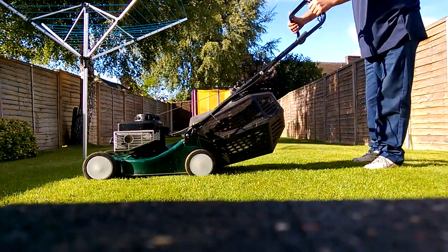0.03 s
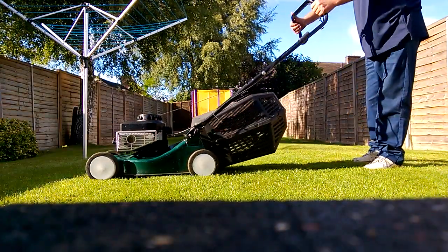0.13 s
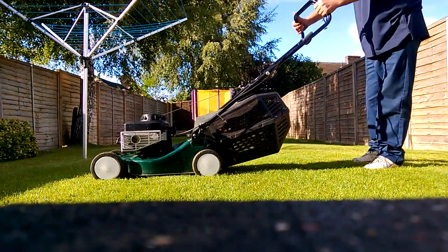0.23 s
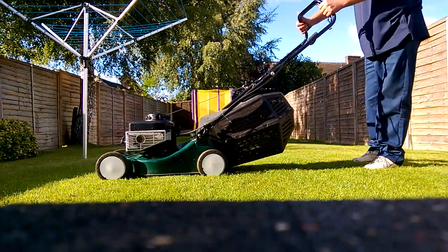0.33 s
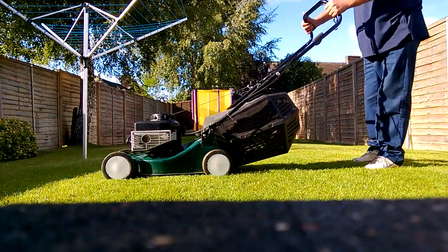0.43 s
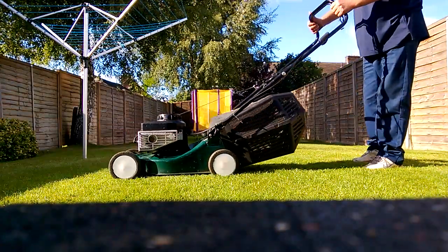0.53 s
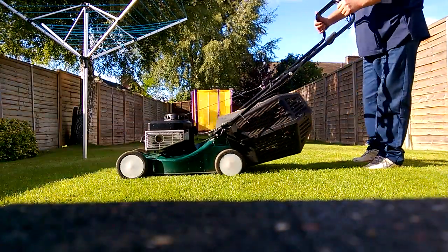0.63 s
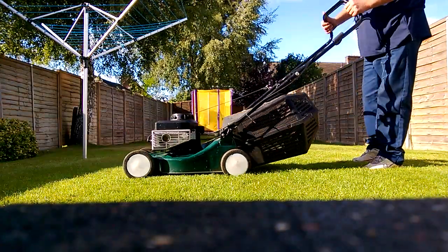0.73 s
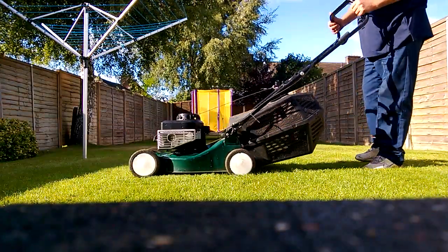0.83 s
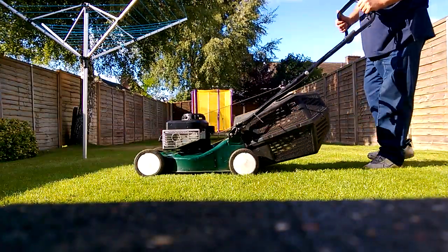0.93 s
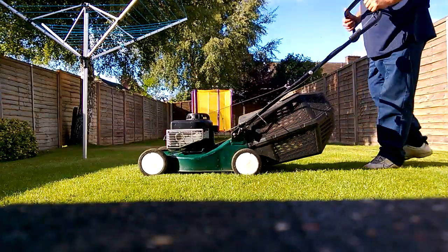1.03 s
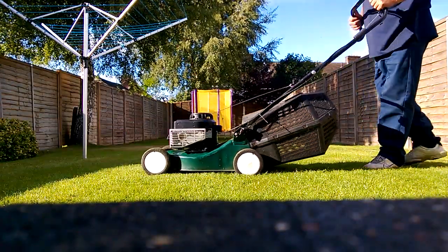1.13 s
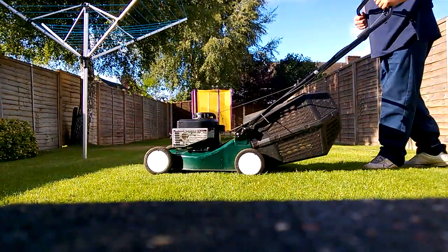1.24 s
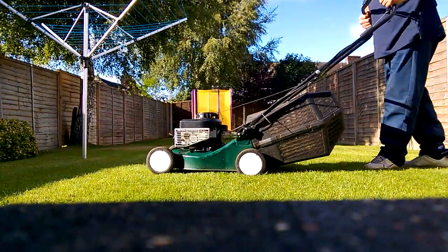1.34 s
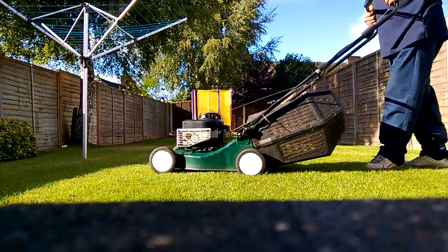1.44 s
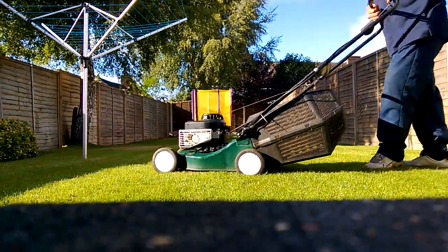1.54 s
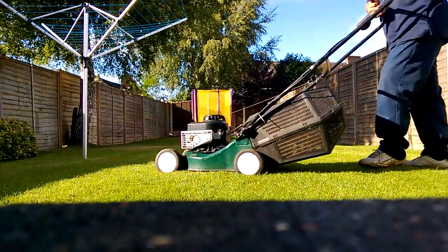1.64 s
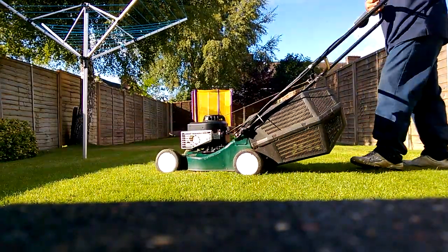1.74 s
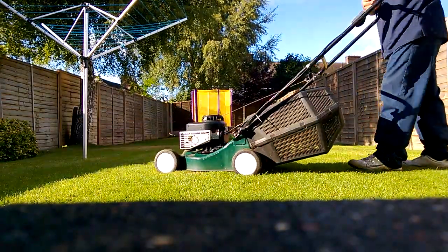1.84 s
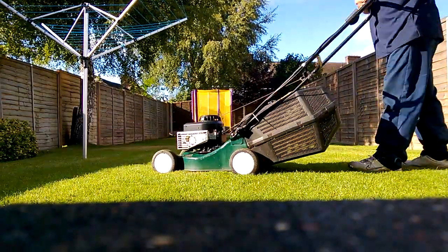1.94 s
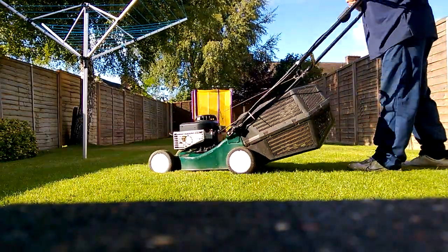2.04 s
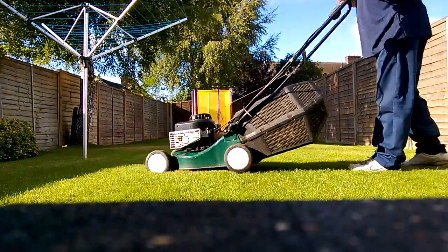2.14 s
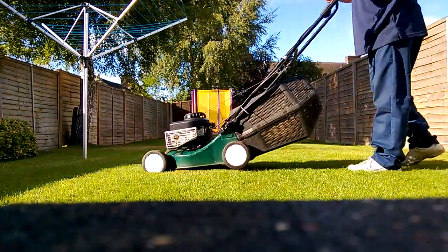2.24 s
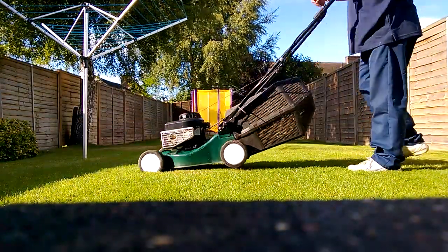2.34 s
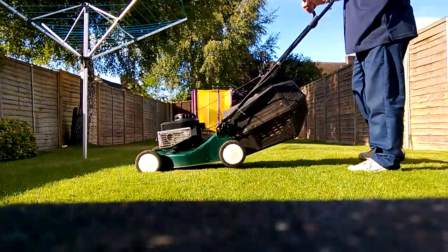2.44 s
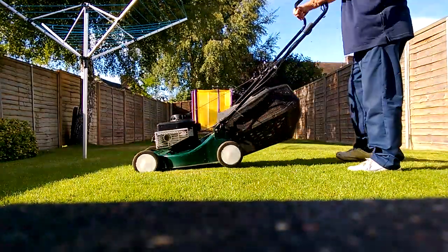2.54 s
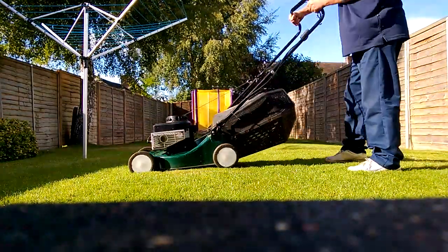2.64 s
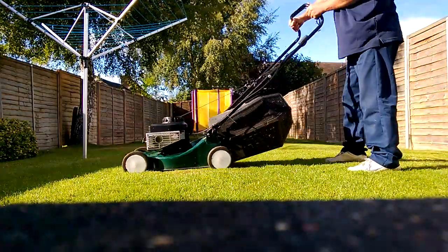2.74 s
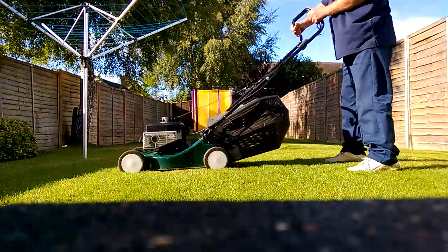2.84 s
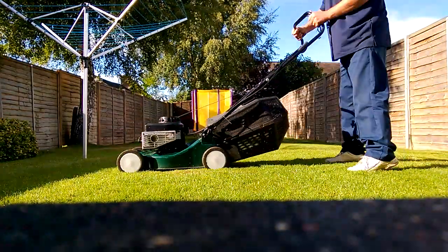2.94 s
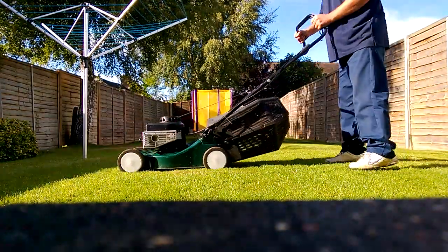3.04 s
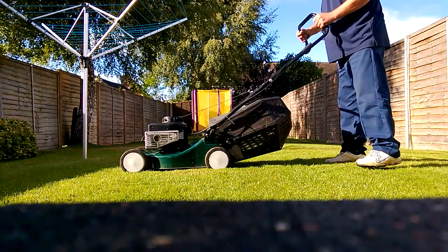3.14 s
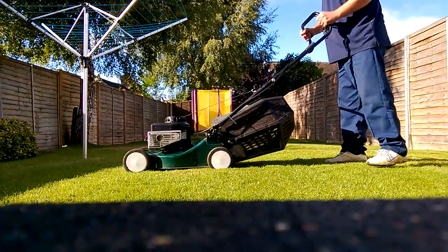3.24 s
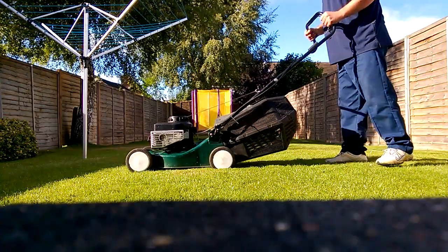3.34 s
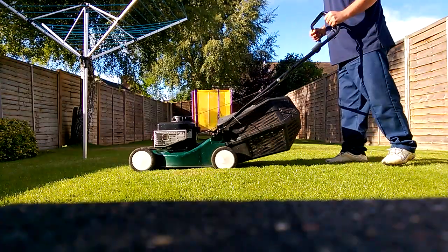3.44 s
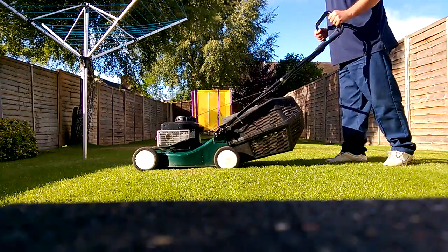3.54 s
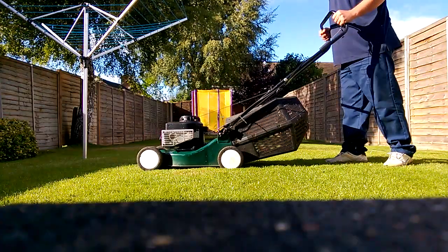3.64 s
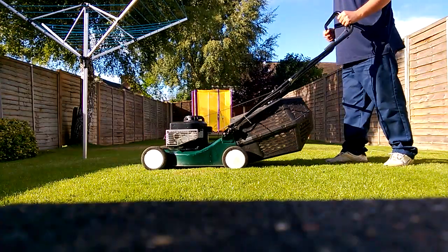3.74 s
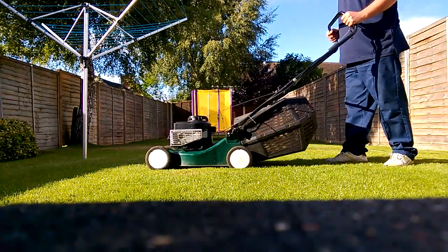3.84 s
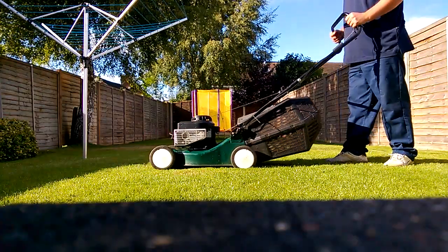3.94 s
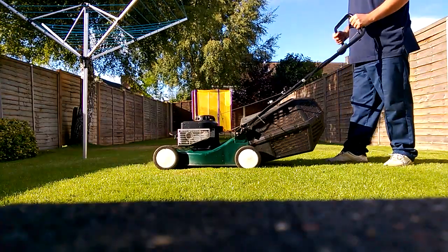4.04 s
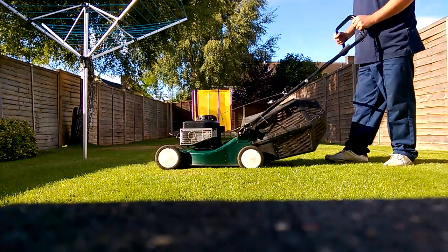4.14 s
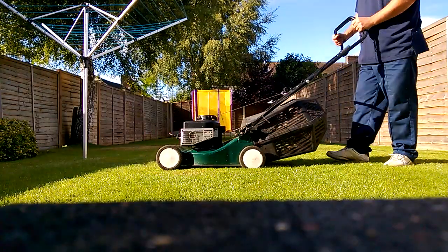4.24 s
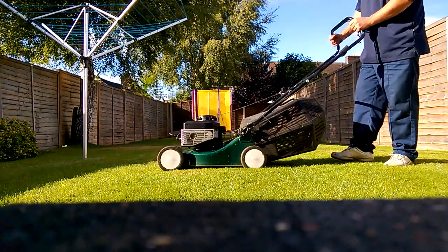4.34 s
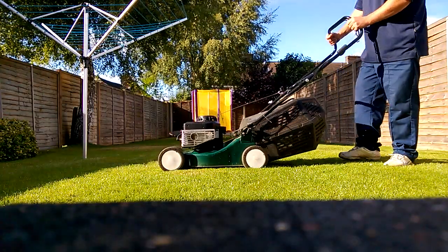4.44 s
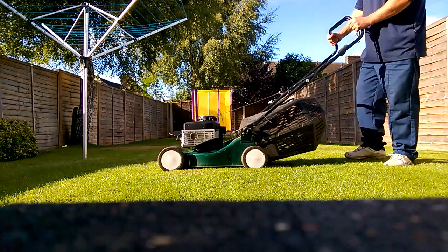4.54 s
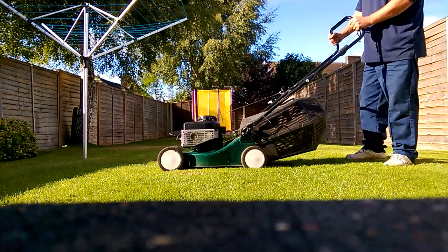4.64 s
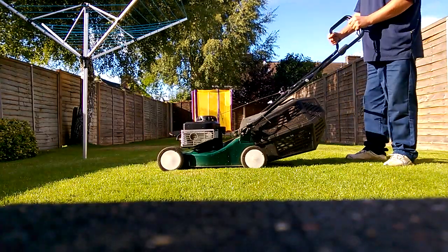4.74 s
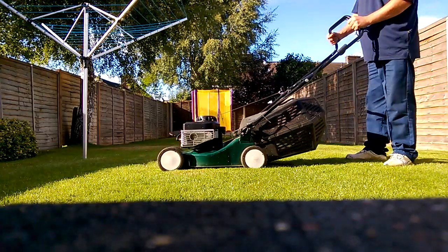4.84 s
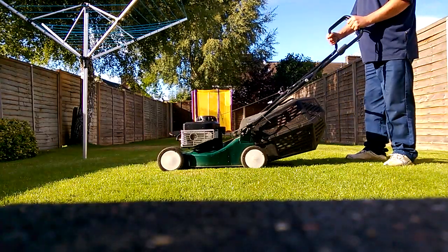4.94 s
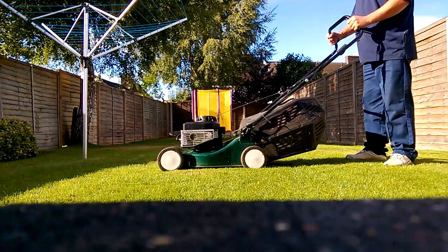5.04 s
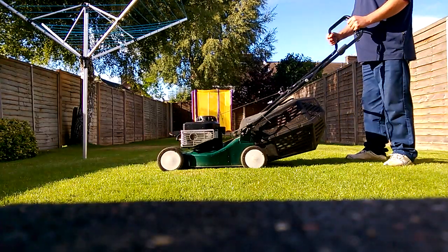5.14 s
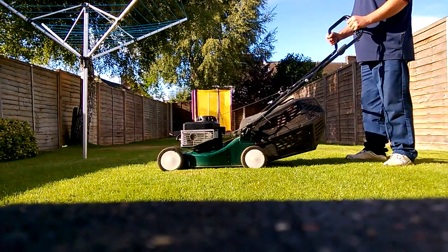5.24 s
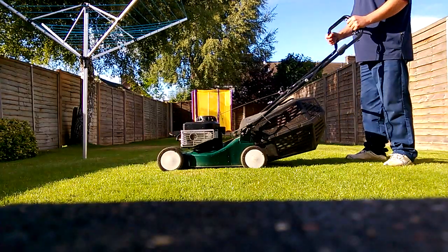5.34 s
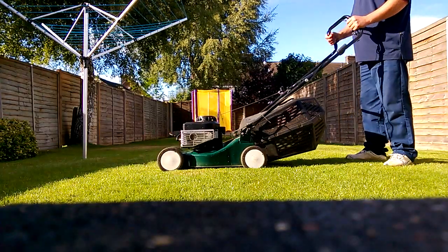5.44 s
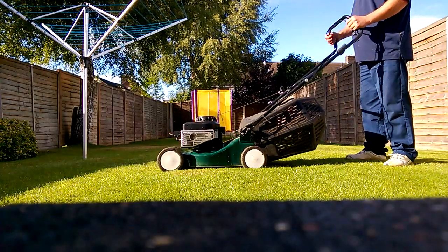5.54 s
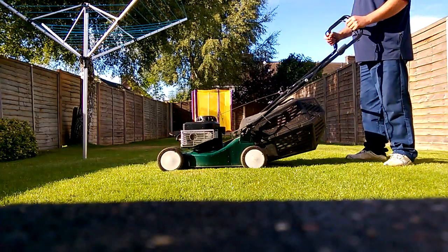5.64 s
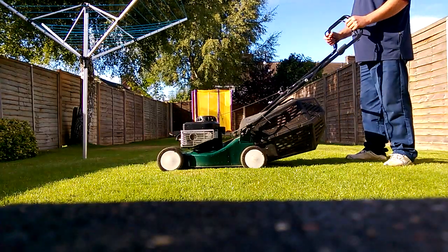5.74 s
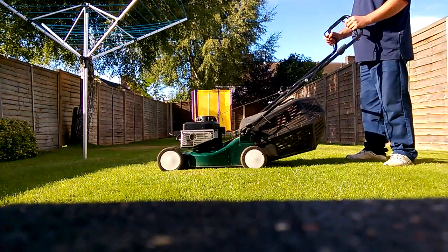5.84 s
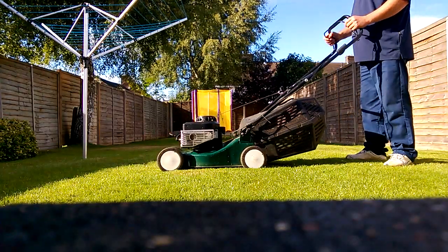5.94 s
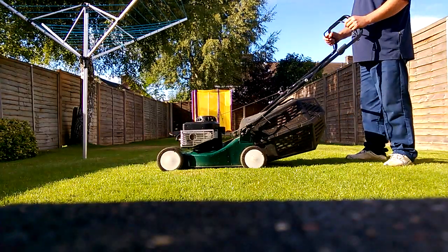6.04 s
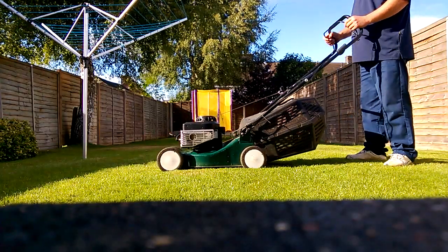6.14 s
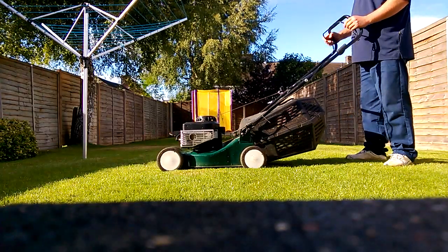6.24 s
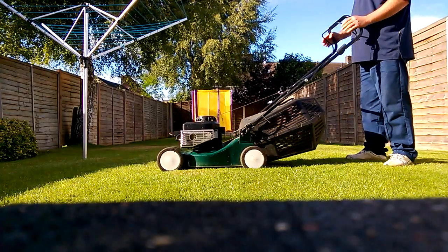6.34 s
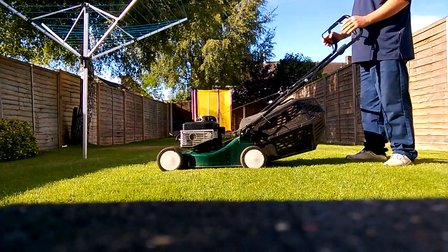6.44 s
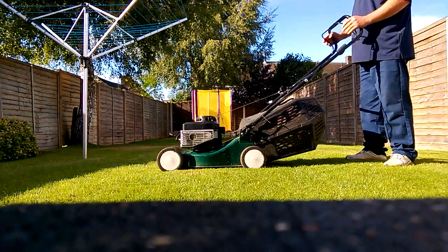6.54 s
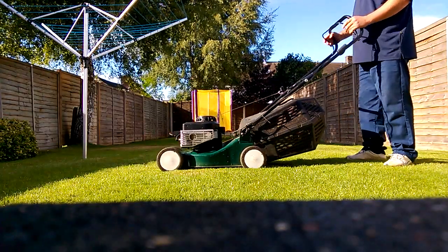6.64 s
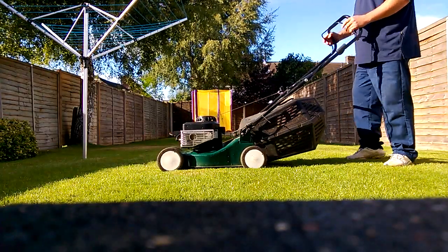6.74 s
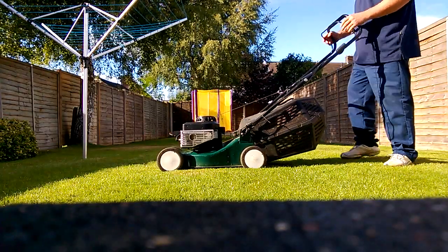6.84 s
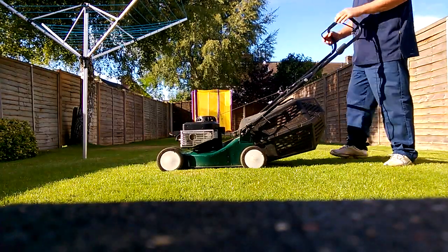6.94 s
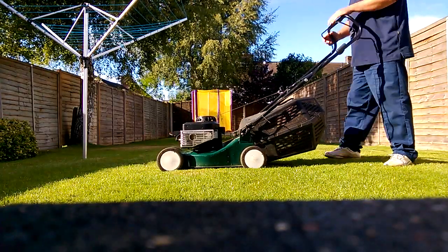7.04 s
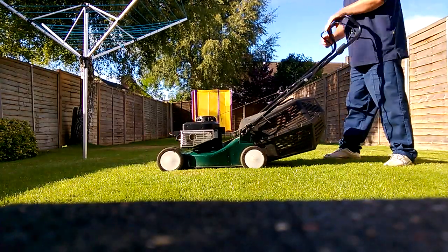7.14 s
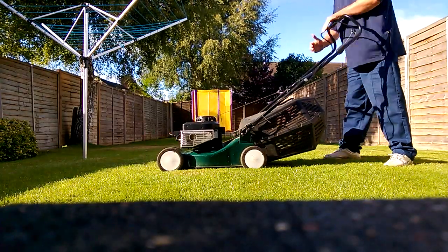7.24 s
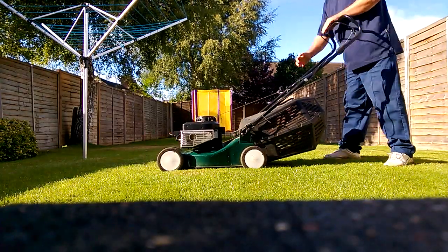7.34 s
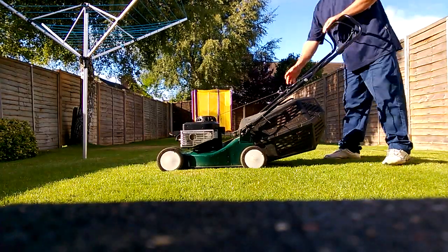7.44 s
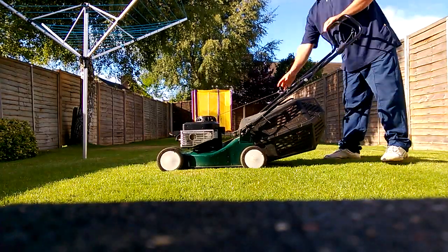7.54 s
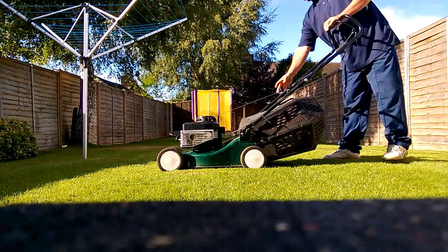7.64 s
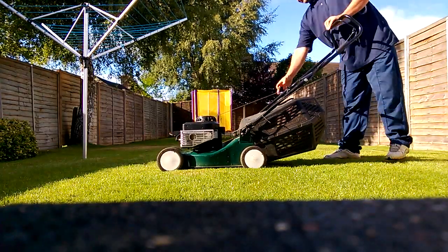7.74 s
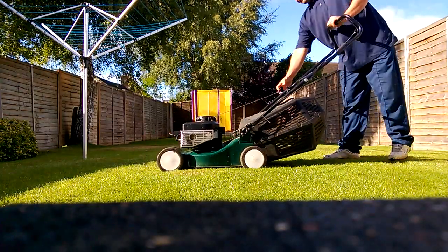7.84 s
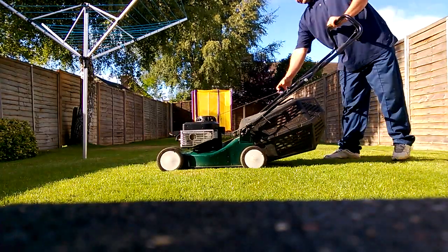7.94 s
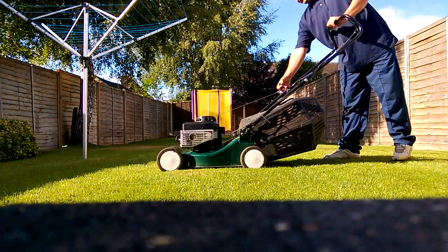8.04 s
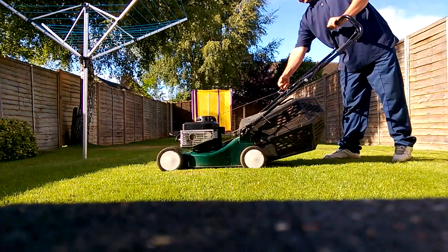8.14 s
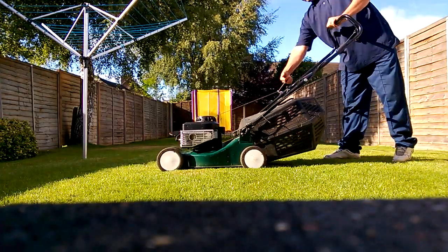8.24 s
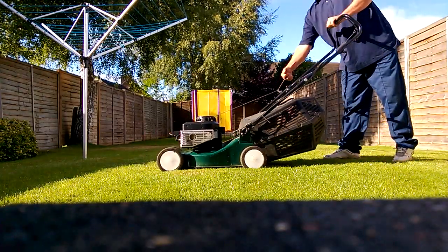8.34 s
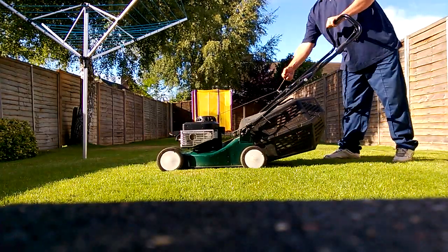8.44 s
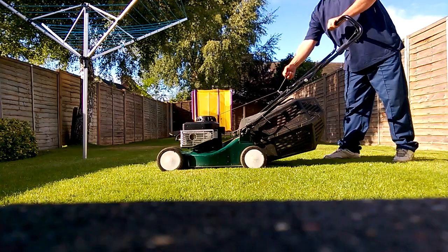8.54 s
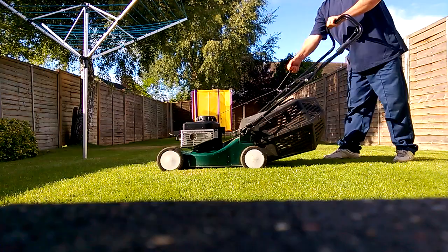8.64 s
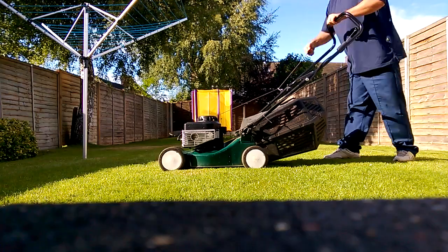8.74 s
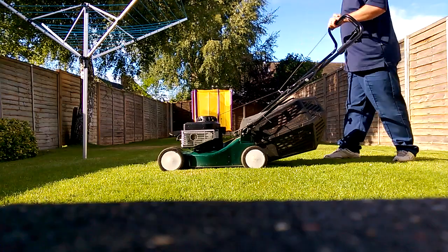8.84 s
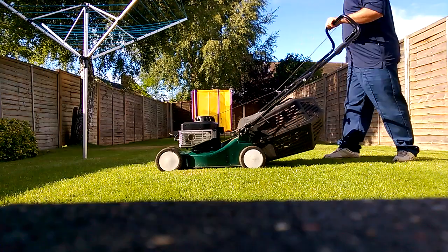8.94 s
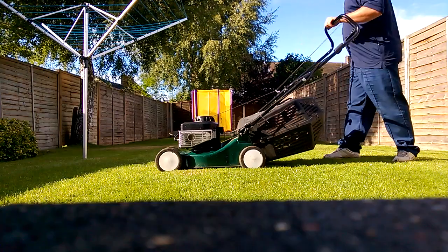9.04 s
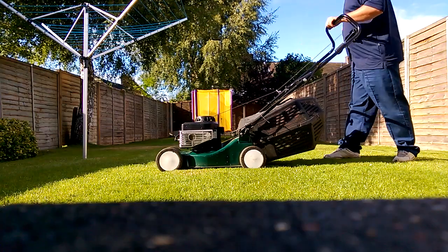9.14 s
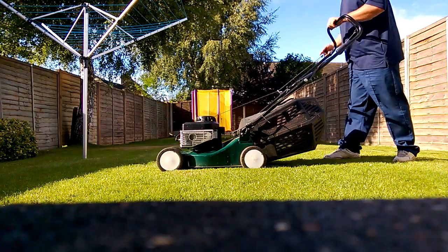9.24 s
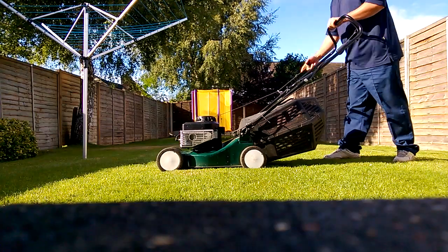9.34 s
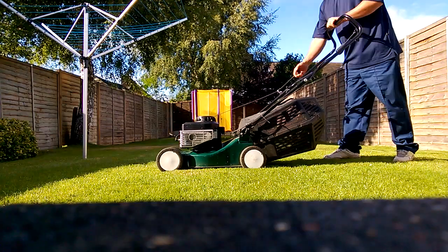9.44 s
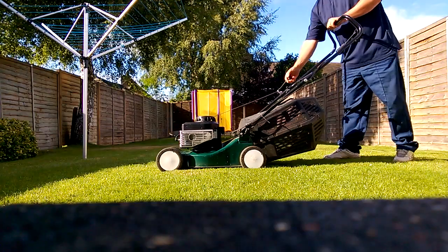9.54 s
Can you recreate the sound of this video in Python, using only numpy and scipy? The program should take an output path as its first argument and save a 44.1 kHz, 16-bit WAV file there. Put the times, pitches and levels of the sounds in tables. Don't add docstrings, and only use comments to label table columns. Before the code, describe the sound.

Outdoors in a small garden, a mower's rapid chugging and rushing blade noise hold steady for about six seconds, then sink quickly in pitch and die with hollow knocks. Faint wind and leaf rustle remain. Two dry handle clicks with a cable scrape follow, then a short starter whine, ratchety rattle and strong irregular pops as the engine roars back. Close microphone, short fence echoes.

```python
import sys
import numpy as np
from scipy import signal
from scipy.io import wavfile

SR = 44100
rng = np.random.default_rng(int(sys.argv[2]) if len(sys.argv) > 2 else 0)


def file_out(sig):
    cols = np.atleast_2d(sig).T
    lim = np.clip(cols, -1, 1)
    pcm = np.round(lim * 32767).astype(np.int16)
    wavfile.write(sys.argv[1], SR, pcm)


def ratio(d):
    e = np.asarray(d, float) / 20
    return 10 ** e


N = 422919
GOVERNED_PER_S = 23.4
PULL_START_S = 8.66


def crank():
    # (time [s], speed [firings/s])
    running = [(0.0, 22.961), (0.36, 23.568), (1.15, 23.381), (1.87, 22.937), (2.12, 24.069), (2.36, 23.03),
               (2.7, 22.622), (2.85, 23.746), (3.74, 23.224), (3.97, 24.156), (4.22, 22.596), (4.5, 23.807),
               (4.63, 23.746), (4.83, 22.496), (5.21, 23.837), (5.89, 23.587), (6.17, 19.766),
               (6.62, 4.647)]
    # (time [s], speed [firings/s])
    restarting = [
        (8.66, 0),
        (8.7, 4.566),
        (8.91, 11.274),
        (9.07, 21.34),
        (9.21, 24.96),
        (9.45, 22.643),
        (9.6, 22.297),
    ]
    first, second = in_time(running, 0)[0], in_time(restarting, 0)[0]
    first_turns = np.cumsum(first) / SR - .645
    second_turns = np.cumsum(second) / SR - .975 + 200
    again = np.arange(N) >= PULL_START_S * SR
    return np.where(again, second_turns, first_turns) + 1, first + second


def charges(turns):
    # (time [s], puff above its layer [dB], thump above its layer [dB])
    pops = [(6.53, 0.5, 2), (8.832, 3, 16.5), (8.928, -2.5, 10), (8.998, 4, 7.5), (9.05, 2, 7.5),
            (9.098, 0.5, 5.5), (9.143, 1.5, 5), (9.183, 3, 5.5), (9.225, -6, 0), (9.266, 2, 5.5),
            (9.307, -1.5, -2), (9.348, 2.5, 4), (9.391, -18, 0), (9.435, 2, 0), (9.479, -1.5, 2),
            (9.523, 0.5, -2), (9.568, -2, -1)]
    strength = rng.standard_normal((240, 2)) * [1.5, 1.0]
    for s, puff_db, thump_db in pops:
        strength[int(np.round(turns[int(s * SR)]))] = puff_db, thump_db
    return strength


def thump(turns, coast, strength, level_db):
    # (frequency [Hz], level [dB], t60 [s])
    muffler = [(161, 2, .03), (143, 1, .15), (215, -5, .05), (56, -9.5, .08)]
    # (frequency [Hz], level [dB], t60 [s])
    intake = [(90, 9.5, 0.038), (470, -4, 0.054)]
    # (delay [s], level [dB])
    fences = [(.0144, -7.5), (.0248, -4), (.0294, -8)]
    cycle = np.floor(turns + .0835).astype(int)
    firing = np.diff(cycle, prepend=cycle[0]) == 1
    clicks = firing * ratio(strength[cycle, 1] + level_db)
    push = signal.lfilter([.08], [1, -.92], clicks)
    governor = 2.0 * np.minimum(4 * coast, 1) * (1 - 0.38 * coast)
    intake_open = np.maximum(governor, np.arange(N) > PULL_START_S * SR)
    boom = -np.roll(ring(push * intake_open, intake), round(.006 * SR))
    return echoed(ring(push, muffler), fences) + boom


def shaft_tones(turns, speed, coast, level_db, blade_db, fan_db, fins_db):
    # (multiple of firing rate [1], level [dB], lag [turns])
    shaft = [(2, -6, .36), (4, -13, .65), (10, -9, .47), (12, -7.5, .58), (14, -19, .3)]
    coasting = [6, 8.3, 1.5, 10.8, 4]
    # (multiple of firing rate [1], level [dB])
    fins = [(18, -16), (20, -16.5), (21, -18.5), (25, -25), (27, -27.5), (28, -18.5), (32, -20.5),
            (36, -22.5)]
    tones = 0
    for (order, db, lag), coast_db in zip(shaft, coasting):
        part_db = blade_db if order < 5 else fan_db
        gain = ratio(db + coast * coast_db + part_db + .2 * order * drift(4))
        wobbly_turns = turns + .004 * drift(5)
        tones = tones + gain * np.sin(2 * np.pi * (order * wobbly_turns - lag))
    for order, db in fins:
        gain = ratio(db + fins_db + 2.0 * drift(0.97))
        tones = tones + gain * np.sin(2 * np.pi * (order * turns + 0.16 * drift(4.1)))
    return tones * ratio(level_db) * np.minimum(speed / 17, 1) ** 3.0


def exhaust_hiss(turns, speed, facing_db, coast, strength, level_db):
    # (frequency [Hz], density [dB per Hz])
    hiss = [(1180, -44), (2000, -2.5), (2860, -1), (3400, -1), (5390, -9), (7640, -5.5), (10300, -5.5),
            (12700, -11.5), (15200, -10), (16000, -17)]
    angle = (turns + 0.044) % 1
    cycle = np.floor(turns + 0.073).astype(int)
    jet = (angle / 0.035) ** 2 * np.exp(2 - 2 * angle / 0.032)
    wheeze = np.exp(-(angle / 0.33) ** 0.98) * (1 - np.exp(-angle / 0.025))
    stroke = ratio(8.0 - 5.4 * coast) * jet + ratio(6.0 + 1.33 * coast) * wheeze
    gas = coloured(hiss, patchy_db=0.0)
    puffs = gas * ratio(strength[cycle, 0]) * stroke
    puffs = duller(puffs, 6700, share=rng.uniform(-0.23, 0.23, 240)[cycle])
    echo = ratio(-8) * duller(np.roll(puffs, round(0.014 * SR)), 11000, share=0.16)
    leak_db = -4.0 - 1.2 * coast - 0.64 * facing_db
    leak = ratio(leak_db) * np.roll(gas, SR) * (speed / GOVERNED_PER_S) ** 0.76
    return ratio(level_db) * duller(puffs + echo + leak, 8100, share=coast ** 2)


def blade_roar(turns, coast, level_db):
    # (frequency [Hz], density [dB per Hz])
    roar = [(35, -13.5), (60, -11.5), (140, -6.5), (170, -45.5), (235, 13.5), (320, -16.5), (470, -0.5),
            (700, -10), (1020, -8.5), (1470, -12), (2060, -19), (3580, -30), (5000, -28.5), (6500, -45.5)]
    # (frequency [Hz], level [dB], t60 [s])
    deck = [(403, -10, 0.18), (486, -6.5, 0.31), (640, -9.5, 0.22), (690, -33, .06), (846, 2, 0.11),
            (1239, -2.5, 0.053), (1424, -4, 0.31)]
    tips = 0.067 * np.cos(8 * np.pi * (turns - .02))
    firings = .5 * np.exp(-((turns + 0.18) % 1) / 0.01)
    beat = 1 + tips + firings
    deck_ring = rms_one(ring(rng.standard_normal(N), deck))
    air = coloured(roar, patchy_db=0.0) + ratio(-11.5) * deck_ring
    flutter = ratio(1.2 * drift(120))
    return ratio(level_db - 2.0) * rms_one(beat * flutter * duller(air, 2220, share=coast))


def starter():
    # (time [s], pulley whine [Hz], level [dB])
    pull = [
        (8.68, 473, -68),
        (8.72, 555, -32.5),
        (8.75, 628, -30),
        (8.762, 828, -46),
        (8.785, 1068, -34.5),
        (8.828, 1053, -29),
        (8.838, 568, -47),
        (8.86, 556, -27),
        (8.9, 485, -58),
    ]
    # (time [s], level [dB])
    rattles = [
        (8.787, -46),
        (8.823, -41.5),
        (8.86, -46.5),
        (8.928, -47),
        (8.95, -34.5),
        (9.0, -36),
        (9.02, -32.5),
        (9.04, -42),
    ]
    # (frequency [Hz], level [dB], t60 [s])
    cowl = [(2680, -0.5, 0.011), (3080, -8, 0.0069), (6400, -5.5, .005), (7660, -10, 0.013),
            (8900, -14, 0.005), (10060, -20, .005)]
    hz, whine_db = in_time(pull)
    t = np.arange(N) / SR
    on = (t > pull[0][0]) & (t < pull[-1][0])
    phase = 2 * np.pi * np.cumsum(hz * (1 + .1 * drift(90))) / SR
    whine = np.sin(phase) * ratio(whine_db + 2) * (.8 + .6 * drift(130))
    rattle = swells(*np.transpose(rattles), rise_s=0.0076, fall_s=0.025)
    struck = rng.random(N) < 490 / SR
    force = ratio(3.5 * np.minimum(rng.exponential(1, N), 3))
    hits = struck * force * rng.choice([-1, 1], N)
    chafe = rattle * ratio(-7.0) * signal.lfilter([1, -.6], [1], rng.standard_normal(N))
    return on * whine + ring(hits * rattle * ratio(7.0), cowl) + chafe


def lever():
    # (time [s], click [dB], scrape [dB], scrape delay [s], scrape length [s])
    throws = [
        (7.875, -34, -39.5, 0.016, 0.044),
        (8.292, -46, -53, 0.022, 0.022),
        (8.329, -39.5, -46, 0.015, 0.043),
    ]
    # (frequency [Hz], level [dB], t60 [s])
    handle = [(553, -10, 0.16), (1240, -5, 0.044), (2570, 3, 0.0066), (3900, -4.5, 0.0027),
              (5200, -10, .004), (6500, -13, 0.0034)]
    t = np.arange(N) / SR
    clicks, scrape, fading = np.zeros(N), np.zeros(N), np.zeros(N)
    for s, click_db, scrape_db, delay, length in throws:
        clicks[round(s * SR)] = ratio(click_db)
        age = np.maximum(t - s, 0)
        swell = age / delay * np.exp(1 - age / delay)
        scrape += ratio(scrape_db) * swell * np.exp(-age / (4 * length))
        fading = np.where(t > s, np.minimum(age / (2.0 * length), 1), fading)
    grit = scrape * rng.standard_normal(N) * ratio(2.2 * drift(120))
    muffled = np.where(t > throws[1][0] - .1, 1, .3)
    cable = duller(grit + .3 * clicks, 8000, share=muffled)
    cable = duller(cable, 9000, share=muffled)
    return ring(clicks + ratio(-31) * grit, handle) + ratio(-3) * duller(cable, 3500, share=fading)


def knocks():
    # (time [s], peak [dB], frequency [Hz], t60 [s])
    blows = [(6.625, -33.5, 480, 0.05), (6.645, -36, 500, .04), (6.673, -37, 1100, 0.015),
             (6.70, -41, 90, .08), (6.755, -39, 60, .08), (6.832, -53.5, 530, 0.082),
             (6.542, -27, 510, 0.033), (7.874, -36, 5240, 0.018), (8.274, -33, 49.6, 0.17),
             (8.33, -53, 6200, 0.036), (8.609, -35, 90, .07), (8.64, -45.5, 450, .04),
             (8.788, -23, 160, 0.03), (8.834, -24, 106, 0.042), (8.986, -11.5, 470, 0.047)]
    out = np.zeros(N)
    for s, peak_db, hz, t60 in blows:
        at = round(s * SR)
        out[at:at + 8000] += ring(np.eye(1, 8000)[0], [(hz, peak_db, t60)])
    return out


def garden():
    # (time [s], wind on the microphone [dB], rustle [dB])
    stirrings = [(6.69, -47, -49), (6.89, -49.5, -77), (7.05, -66, -73), (7.33, -67.5, -59),
                 (7.55, -50, -54.5), (7.63, -50.5, -69), (7.8, -52, -60), (7.89, -56, -49.5),
                 (8.06, -64, -56), (8.23, -51, -68), (8.3, -49, -63), (8.35, -59, -47.5),
                 (8.63, -36.5, -66)]
    # (frequency [Hz], density [dB per Hz])
    leaves = [(88, -37), (150, -10.5), (407, -5), (458, -9), (614, 0), (699, -8.5), (1030, -9.5),
              (1080, -9.5), (2000, -27.5), (2600, -58), (4400, -120)]
    # (frequency [Hz], density [dB per Hz])
    self_noise = [(1060, -27), (1800, 2), (5440, -4.5), (8910, -13), (15100, -13.5), (16000, -21)]
    s, wind_db, rustle_db = np.transpose(stirrings)
    rise_s, fall_s, calm_wind_db, calm_rustle_db = 0.033, 0.068, -59, -65
    gusts = np.hypot(ratio(calm_wind_db), swells(s, wind_db, rise_s, fall_s))
    stirs = np.hypot(ratio(calm_rustle_db), swells(s, rustle_db, rise_s, fall_s))
    low_band = signal.butter(2, [25, 100], "band", fs=SR, output="sos")
    rumble = signal.sosfilt(low_band, rng.standard_normal(N))
    wind = gusts * ratio(-1.0) * rms_one(rumble * ratio(2 * drift(19)))
    rustle = stirs * coloured(leaves, patchy_db=0.5)
    return wind + rustle + ratio(-78) * coloured(self_noise, patchy_db=-2.2)


def layer_db(speed, coast, throttle, base_db, per_db, unfired_db, throttle_db, stall_db):
    speed_db = 20 * np.log10(speed / GOVERNED_PER_S + 1e-4)
    db = base_db + per_db * speed_db + unfired_db * coast + throttle_db * throttle
    db = db - stall_db * np.maximum(6.43 - speed, 0)
    fall = 298 * np.arange(N) / SR
    return np.maximum.accumulate(db + fall) - fall


def rms_one(x):
    return x / np.sqrt(np.mean(x ** 2) + 1e-20)


def in_time(rows, outside=None):
    s, *columns = np.transpose(rows)
    return [np.interp(np.arange(N) / SR, s, c, outside, outside) for c in columns]


def drift(rate):
    r = np.exp(-80 * np.pi * rate / SR)
    slow = signal.lfilter([1], [1, -2 * r, r * r], rng.standard_normal(N // 40 + 2002))[2000:]
    return np.interp(np.arange(N) / 40, np.arange(len(slow)), rms_one(slow))


def ring(clicks, modes):
    out = 0
    for hz, level_db, t60 in modes:
        r, w = ratio(-60 / (t60 * SR)), 2 * np.pi * hz / SR
        strike = [0, ratio(level_db) * np.sin(w)]
        out = out + signal.lfilter(strike, [1, -2 * r * np.cos(w), r * r], clicks + 1e-18)
    return out


def coloured(spectrum, patchy_db):
    hz, level_db = np.transpose(spectrum)
    edges = np.geomspace(hz[0], min(hz[-1], 19000), 17)
    white = rng.standard_normal((2, N))
    out = 0
    for k, (low, high) in enumerate(zip(edges, edges[1:])):
        band_pass = signal.butter(2, [low, high], "band", fs=SR, output="sos")
        band = signal.sosfilt(band_pass, white[k % 2])
        band_db = np.interp(np.log(low * high) / 2, np.log(hz), level_db)
        out = out + band * ratio(band_db + patchy_db * drift(3.65))
    return rms_one(out)


def echoed(x, echoes):
    return x + sum(ratio(db) * np.roll(x, round(s * SR)) for s, db in echoes)


def duller(x, hz, share):
    low = signal.sosfilt(signal.butter(2, hz, fs=SR, output="sos"), x)
    return x + share * (low - x)


def swells(times, levels_db, rise_s, fall_s):
    t = np.arange(N) / SR
    power = 0
    for s, db in zip(times, levels_db):
        distance = np.maximum((s - t) / rise_s, (t - s) / fall_s)
        power = power + ratio(2 * db) * np.exp(-2 * distance)
    return np.sqrt(power)


def scene():
    # (time [s], nearness [dB], exhaust facing the microphone [dB],
    # deck tipped up [0-1], draught under the deck [dB])
    path = [(0, 6, 2, 0, -1.5), (.5, 3, 1, 0.1, 0), (1.2, 3, 2, 0.44, 0), (1.8, -0.3, 3.5, 1, -2),
            (2.3, 1.5, 0.5, 1.05, 1.5), (2.8, 1, -0.9, 0.36, -1), (3.3, 1.5, 0.5, 0.33, 0),
            (3.9, -0.5, 1.5, 0.7, 0.5), (4.2, 0, .6, 0.5, 4.5), (4.5, -1.5, -1.9, 0, 2.5),
            (5.0, 1.2, 0.5, 0.1, 2.5), (5.5, 0.3, -1.5, 0, 2.5), (6, 1.7, 1.5, 0, 2),
            (9.59, 1.2, 2, 0.1, 1.5)]
    near_db, facing_db, tipped, draught_db = in_time(path)
    turns, speed = crank()
    strength = charges(turns)
    since_catch = np.arange(N) / SR - 8.921
    coast = np.clip((22.6 - speed) / 5, 0, 1) * (since_catch < 0)
    throttle = (since_catch >= 0) * np.exp(-np.abs(since_catch) / 0.18)
    state = speed, coast, throttle

    thump_db = near_db + layer_db(*state, base_db=-27, per_db=2, unfired_db=-2, throttle_db=5.5, stall_db=1.1)
    hiss_db = facing_db + layer_db(*state, base_db=-41, per_db=1.72, unfired_db=6.5, throttle_db=16.5, stall_db=26)
    roar_db = layer_db(*state, base_db=-28, per_db=1.28, unfired_db=-0.5, throttle_db=5, stall_db=3)
    roar_db = roar_db + 0.17 * near_db + 0.87 * facing_db - 2.2 * tipped + 0.5 * draught_db
    blade_db = -2.5 + 5.4 * tipped - 12 * throttle
    fan_db = -1.5 + 2.2 * tipped - 4 * throttle
    fins_db = 2.6 - 0.69 * tipped + 3.8 * throttle + draught_db

    engine = thump(turns, coast, strength, thump_db)
    engine = engine + shaft_tones(turns, speed, coast, thump_db, blade_db, fan_db, fins_db)
    engine = engine + exhaust_hiss(turns, speed, facing_db, coast, strength, hiss_db)
    mower = engine + blade_roar(turns, coast, roar_db)
    return (mower + starter() + lever() + knocks() + garden())[None]


def band_limit(x):
    return signal.sosfilt(signal.butter(12, 16650, fs=SR, output="sos"), x)


def record(dry):
    low_cut = signal.sosfilt(signal.butter(2, 35, "high", fs=SR, output="sos"), dry)
    top_cut = signal.sosfilt(signal.cheby2(12, 30, 16050, fs=SR, output="sos"), low_cut)
    return band_limit(top_cut)


dry = scene()
out = record(dry)
file_out(out)
```